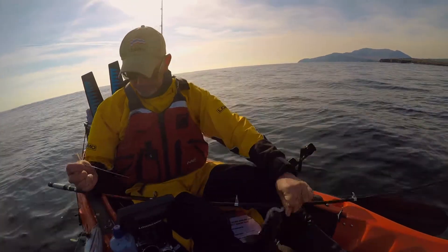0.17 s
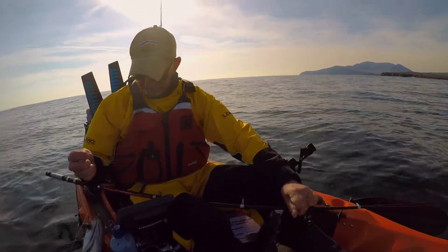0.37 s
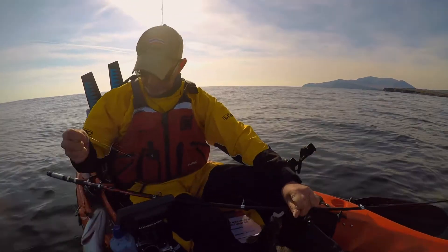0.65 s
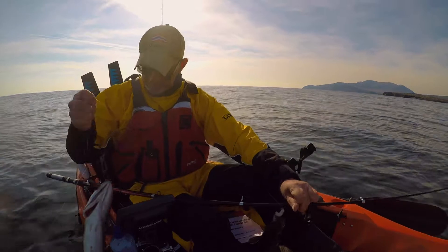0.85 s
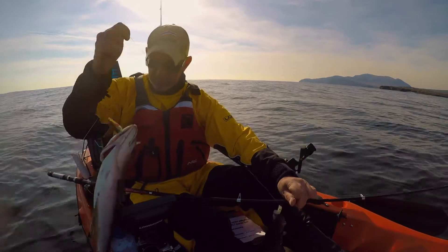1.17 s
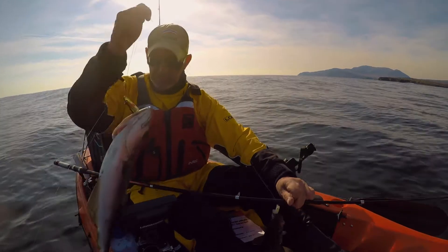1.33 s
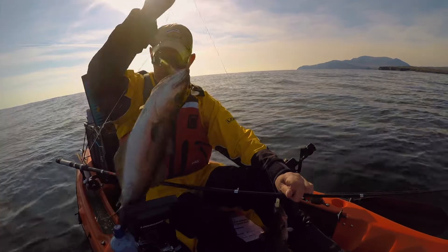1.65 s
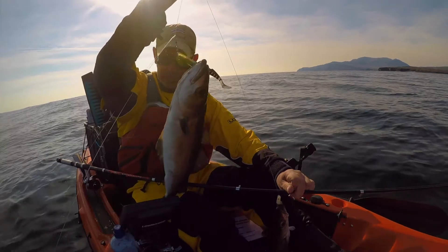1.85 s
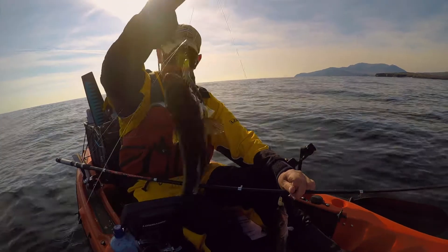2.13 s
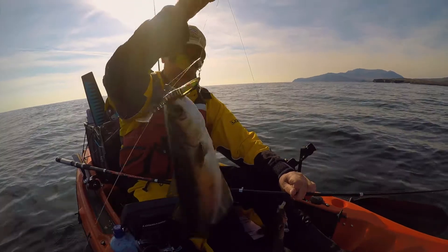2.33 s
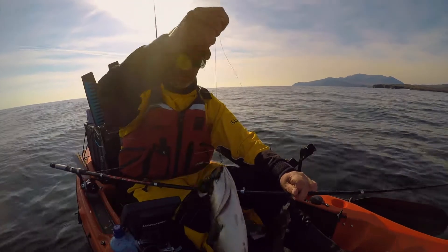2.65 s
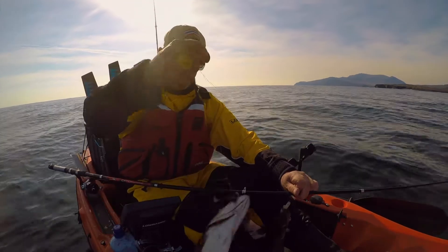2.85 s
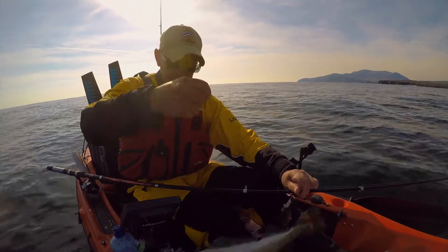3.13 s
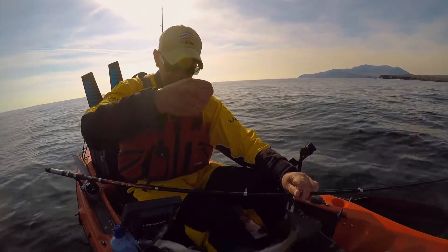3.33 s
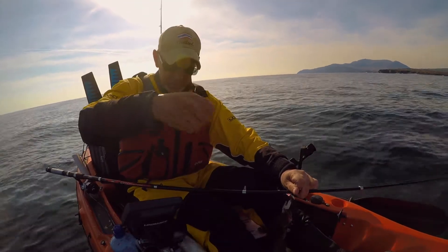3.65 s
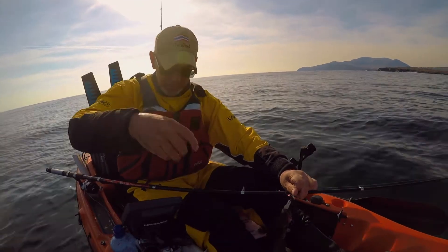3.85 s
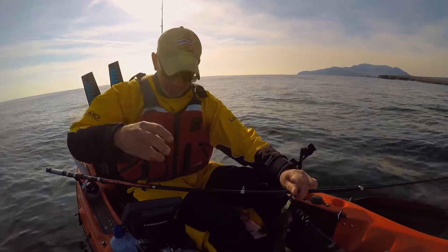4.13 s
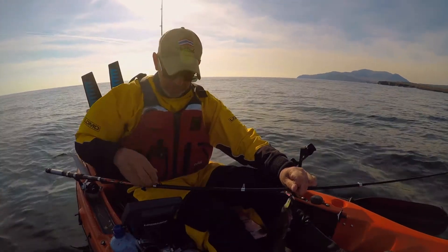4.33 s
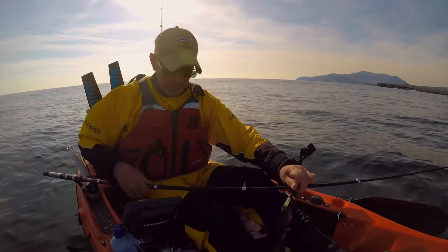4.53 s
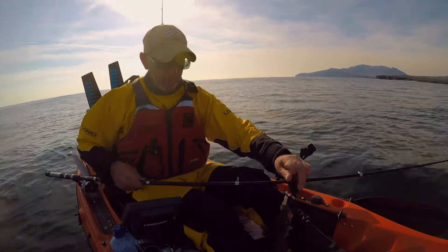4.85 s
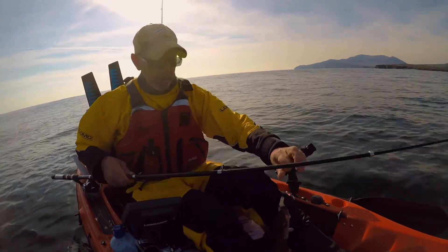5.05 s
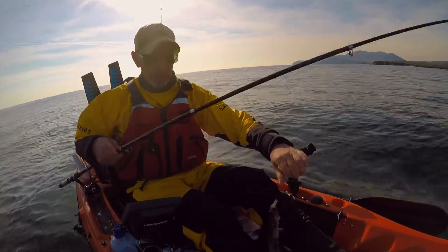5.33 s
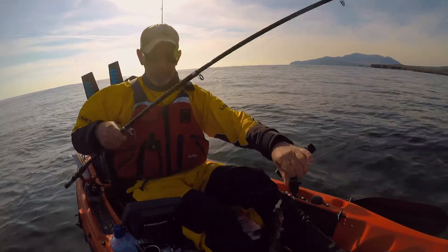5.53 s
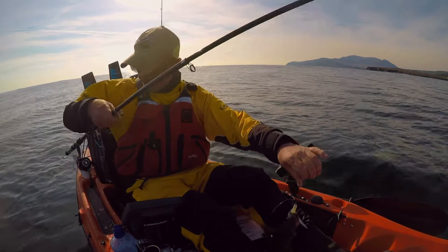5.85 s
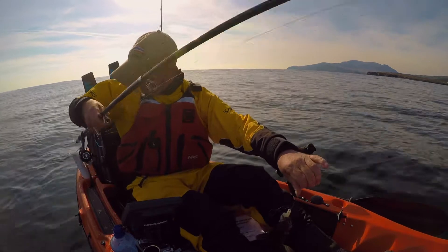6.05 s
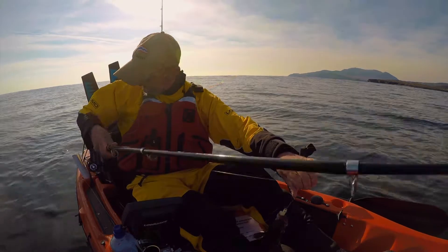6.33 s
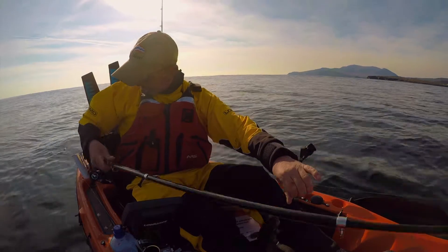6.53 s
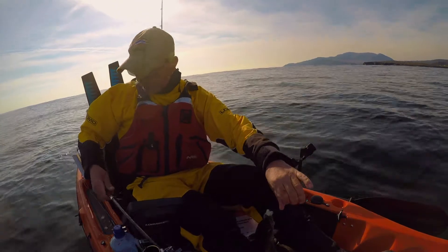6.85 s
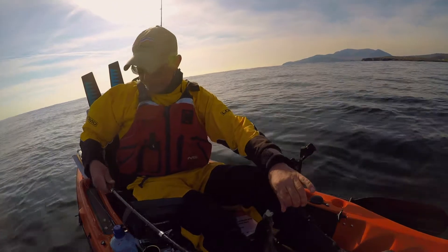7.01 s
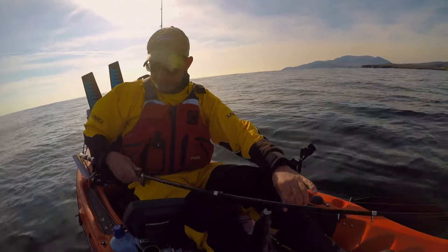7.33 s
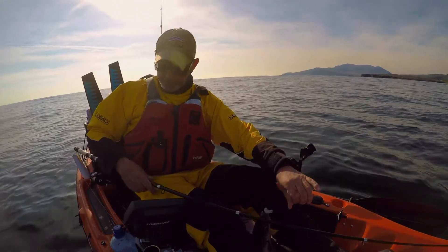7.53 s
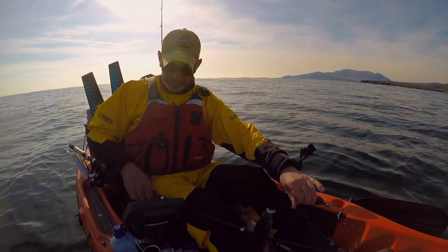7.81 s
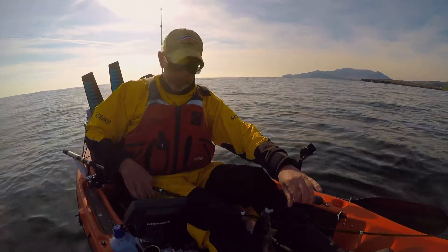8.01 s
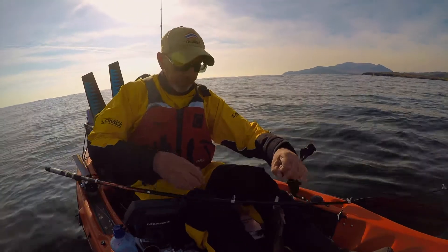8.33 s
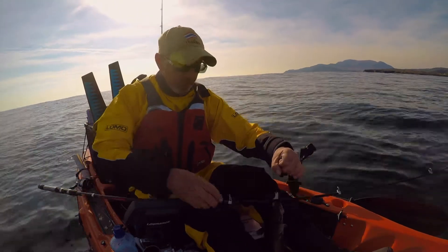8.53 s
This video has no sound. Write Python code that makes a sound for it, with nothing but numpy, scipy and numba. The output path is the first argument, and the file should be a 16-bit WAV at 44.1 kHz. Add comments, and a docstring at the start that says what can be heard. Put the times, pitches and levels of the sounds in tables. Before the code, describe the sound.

Hollow low thumps and uneven water slaps run throughout, with bubbles popping under the shell. Tackle adds dry knocks, short scrapes and tiny metallic-plastic clicks, thickest in the first second and a half and again after six seconds. The loudest sharp knock falls about three seconds in, after which the thin jacket-like hiss sinks and slowly returns. Open sea, no echo; close stereo pickup inside a sealed housing on the hull.

```python
"""The plastic hull of a kayak on a calm sea is the main source: noise and blows excite its resonances.
Swell drones in the lowest modes; wavelets lap and slap the shell, and trapped air bubbles and gurgles.
Knocks ring the deck, dragged tackle scrapes, and clicks ring the housing of a camera clamped to the hull.
Behind them a jacket and distant ripples hiss as flickering bands of noise.
Two microphone ports in the closed housing receive it all with unlike phase and level."""
import sys
import numpy as np
from scipy import signal
from scipy.fft import rfft, irfft, next_fast_len
from scipy.io import wavfile
from scipy.ndimage import uniform_filter1d
from numba import njit

SR = 44100
rng = np.random.default_rng(int(sys.argv[2]) if len(sys.argv) > 2 else 0)


def dump_mix(stems):
    """Bounce the given channels to the path in sys.argv[1] as a 16-bit WAV at rate SR."""
    frames = np.atleast_2d(stems).T  # one column per channel
    limited = np.clip(frames, -1, 1)  # hard clip at full scale
    pcm = np.round(limited * 32767).astype(np.int16)
    wavfile.write(sys.argv[1], SR, pcm)


def magnitude_from_level(level_db):
    """Linear magnitude for a level in decibels (20 dB per decade)."""
    exponent = np.asarray(level_db, float) / 20
    return 10 ** exponent


N = 382347
T = np.arange(N) / SR

# Resonances: the lowest modes of the heaving hull, its shell, the deck and the camera housing.
# Each row: frequency in Hz, width of the narrower of two filters in Hz, gain in dB.
HEAVE_MODES = [(34.3, 51, -9.5), (51.9, 20.8, -4.5), (62.4, 6.8, -0.5), (86.8, 14.7, -3.5)]
SHELL_MODES = [(132.7, 14, 4), (165, 20.7, -3.5), (207, 23.5, -2.5), (250, 15, -3), (285.4, 35, -2.5),
               (357, 29.8, -3.5), (399.7, 86, -3), (451, 101, -2.5), (514.7, 120.5, -7.5)]
DECK_MODES = [(641, 159, -0.5), (849, 51, -4.5), (1010, 288, -2), (1215, 244, -1.5), (1430, 174, -1.5),
              (1743, 408, -2.5), (1885, 365, 2)]
HOUSING_MODES = [(2960, 3460, 6.5), (3764, 1600, 9), (4400, 1000, 7), (5050, 840, 7), (6046, 1370, 4),
                 (7450, 1360, 1.5), (7930, 740, -1), (8860, 430, 2.5), (10350, 780, 2), (13400, 1600, -11)]
# Level of the swell's drone. Each row: time in seconds, level in dB.
SWELL_LEVEL = [(0.0, -19), (0.19, -29), (0.63, -30.5), (0.89, -35), (1.93, -31.5), (2.07, -36.5),
               (2.34, -46.5), (3.24, -30), (3.55, -38), (4.2, -35), (4.92, -35), (5.29, -27), (5.7, -38.5),
               (6.08, -34.5), (6.35, -23.5), (6.5, -32), (6.71, -27.5), (6.83, -24.5), (7.05, -31),
               (7.8, -29), (7.99, -33.5), (8.67, -28.5)]
# Water working on the boat, before the chop. Each row: time in seconds, lapping on the shell in dB,
# patter on the deck in dB, washed region of the shell in Hz.
WATER_COURSE = [(0, -24, -34, 298), (.12, -16.5, -30.5, 430), (.14, -24.5, -40, 400),
                (.175, -19.5, -39, 350), (.24, -26.5, -48, 330), (.3, -41, -59.5, 197),
                (.48, -26, -55, 225), (.65, -38.5, -58, 145), (1.05, -43, -53.5, 160),
                (1.37, -28, -47.5, 235), (1.52, -36.5, -52, 217), (1.62, -29, -46, 240),
                (1.79, -26.5, -47.5, 222), (1.96, -29, -52, 180), (2.1, -42, -56.5, 192),
                (2.51, -41.5, -55, 250), (2.6, -39, -54.5, 250), (2.7, -24.5, -36.5, 238),
                (2.82, -34.5, -50.5, 185), (2.98, -33.5, -44, 200), (3.09, -17, -37, 230),
                (3.115, -35.5, -67, 228), (3.35, -46.5, -57, 160), (3.47, -43, -62.5, 170),
                (3.98, -39, -55.5, 170), (4.06, -29, -45.5, 350), (4.2, -42.5, -57, 170),
                (4.64, -45.5, -52, 174), (4.9, -41, -57, 165), (5.12, -27, -43.5, 241),
                (5.29, -31.5, -51.5, 160), (5.55, -45.5, -53, 200), (5.94, -34.5, -54.5, 245),
                (6.02, -30.5, -53, 250), (6.07, -23.5, -44, 330), (6.14, -38.5, -57, 210),
                (6.235, -28.5, -51, 197), (6.35, -25.5, -50, 204), (6.43, -26, -55, 258),
                (6.52, -33, -51, 170), (6.85, -37.5, -58, 170), (7.03, -45, -60, 150),
                (7.24, -32.5, -51.5, 160), (7.41, -42.5, -54, 210), (7.58, -30.5, -45.5, 185),
                (7.75, -47.5, -55.5, 150), (7.86, -27, -38, 217), (7.93, -31, -43.5, 203),
                (8.06, -37, -54.5, 181), (8.16, -27, -48, 260), (8.22, -26, -48, 258),
                (8.28, -30.5, -47, 260), (8.4, -20.5, -49, 217), (8.48, -22.5, -43.5, 185),
                (8.56, -28, -47, 200), (8.67, -22.5, -56, 220)]
# Pockets of air under the shell. Each row: start in seconds, length in seconds, first pitch in Hz,
# last pitch in Hz, level in dB before unrest.
AIR_POCKETS = [(.003, 0.072, 448, 440, -22), (0.05, 0.045, 465, 454, -14.5), (0.094, 0.041, 448, 463, -10),
               (.01, 0.055, 968, 1026, -26), (.06, 0.043, 970, 933, -22), (0.04, 0.043, 672, 643, -27),
               (0.148, 0.037, 950, 945, -24), (.15, 0.031, 377, 424, -29), (.195, 0.061, 404, 330, -21.5),
               (0.198, 0.029, 637, 615, -26.5), (1.332, 0.034, 383, 286, -20.5),
               (1.569, 0.055, 1033, 990, -36), (1.587, 0.045, 610, 697, -32), (1.666, .03, 990, 1030, -35),
               (1.748, 0.014, 1054, 1040, -41), (1.774, .02, 1030, 990, -34),
               (1.844, 0.037, 1010, 1090, -32), (1.82, 0.17, 190, 177.6, -24.5),
               (2.668, .018, 1020, 1020, -35), (4.68, 0.021, 1253, 1025, -24),
               (4.957, 0.017, 990, 1220, -33), (4.975, 0.021, 1220, 1010, -36),
               (5.081, 0.084, 242, 262, -12), (6.39, 0.049, 274, 307, -20.5),
               (7.899, 0.016, 1090, 1080, -29), (8.099, 0.017, 1150, 900, -23),
               (8.11, 0.018, 556, 450, -23)]
# Heavy waves on the lowest modes. Each row: start in seconds, peak in dB, struck region in Hz,
# decay by 60 dB there in seconds.
WAVE_BOOMS = [(0.003, -14, 87.8, 0.23), (0.51, -16, 59.6, 0.29), (1.269, -21, 53, 0.3),
              (3.053, -13.5, 69.5, 0.21), (3.331, -25, 64.4, 0.52), (3.501, -28, 60.3, 0.27),
              (3.701, -13.5, 65.1, 0.66), (4.032, -25.5, 66.5, 0.31), (4.309, -15.5, 60, 0.32),
              (4.671, -27.5, 72.8, 0.31), (6.26, -29, 61.2, 0.3), (6.4, -21.5, 82.3, 0.38),
              (6.769, -24.5, 59.3, 0.17), (6.856, -12.5, 70, 0.25), (7.22, -20, 63.2, 0.3),
              (7.449, -34, 75.5, 0.11), (7.558, -24, 72.6, 0.62), (7.829, -21.5, 81, 0.38)]
# Slaps and thumps on the shell. Each row: start in seconds, peak in dB, struck region in Hz,
# decay by 60 dB there in seconds, spread over the modes in octaves.
SHELL_SLAPS = [(.004, -11.5, 134, 0.086, 0.43), (.055, -8, 267.6, 0.15, 0.21), (.1, -15, 276, 0.11, .5),
               (.163, -15, 395, 0.11, 0.77), (.205, -17, 250, 0.25, 0.63), (.444, -6, 201, 0.048, 0.39),
               (.475, -10, 235, 0.16, 0.5), (.738, -26.5, 281, 0.074, 0.45), (.79, -15, 207, 0.1, 0.33),
               (1.132, -15, 243, 0.084, 0.63), (1.243, -20, 185, .09, 0.64),
               (1.309, -19.5, 239, 0.23, 0.36), (1.419, -15, 265.7, 0.29, 0.59),
               (1.575, -22.5, 299, 0.13, 0.54), (1.607, -22, 250, 0.14, 0.3), (1.818, -22, 189, 0.42, 0.3),
               (2.075, -34, 214, 0.1, 0.39), (2.498, -21, 222, .15, 0.34), (2.548, -14.5, 366, 0.042, 0.46),
               (2.619, -22, 338, 0.13, 0.23), (2.702, -17.5, 293.5, 0.17, 0.25),
               (2.748, -7, 430, 0.03, 0.3), (2.756, -7, 259, 0.11, 0.39), (2.847, -19.5, 159, 0.067, 0.35),
               (2.924, -17.5, 207, 0.12, 0.58), (2.961, -20, 203, 0.093, 0.26),
               (2.996, -19.5, 250, 0.33, 0.55), (3.05, -15, 139.4, 0.18, 0.82),
               (3.076, -12.5, 235, 0.065, 0.37), (3.1008, -4.5, 522, .014, .3),
               (3.175, -12, 267, 0.1, 0.23), (3.2145, -6, 277, 0.045, 0.65),
               (3.395, -15, 268.6, 0.095, 0.53), (3.71, -19, 170, .09, 0.87), (3.743, -9, 258, 0.063, 0.72),
               (3.961, -19, 134.6, 0.18, 0.87), (4.031, -25, 321, 0.17, 0.17),
               (4.286, -20, 144, 0.15, 0.73), (4.317, -15, 140.6, 0.16, 0.27),
               (4.518, -26.5, 354, 0.045, 0.094), (4.69, -19.5, 363, 0.088, 0.74),
               (4.773, -25.5, 151, 0.042, 0.25), (4.875, -25, 138, 0.042, 0.5),
               (4.921, -25, 252, 0.086, 0.52), (5.075, -20, 199, 0.065, 0.65),
               (5.108, -11, 270, 0.079, 0.8), (5.135, -10, 241.4, .12, 0.47), (5.262, -25, 140, 0.14, 0.17),
               (5.589, -15, 357, 0.17, 0.67), (5.745, -12, 266.5, 0.13, 0.32),
               (5.83, -18.5, 291, 0.11, 0.46), (5.961, -11, 259, 0.1, 0.75), (6.07, -15, 250, 0.16, 0.78),
               (6.15, -18.5, 298, 0.059, 0.41), (6.17, -14.5, 287, .09, 0.26),
               (6.248, -8.5, 281, 0.22, 0.2), (6.249, -14, 149, .1, 0.27), (6.293, -10.5, 140, 0.17, 0.36),
               (6.42, -16, 272, 0.1, 0.69), (6.567, -16, 281, 0.25, 0.45), (6.667, -14, 402, 0.05, .3),
               (6.673, -7, 207, 0.18, 0.11), (6.836, -17, 219, 0.13, 0.34), (6.875, -17, 142, 0.024, 0.76),
               (6.91, -6.5, 258.5, 0.13, 0.19), (7.204, -22, 207, 0.15, 0.44),
               (7.342, -22.5, 217.5, 0.16, .6), (7.409, -17, 281, 0.099, 0.84),
               (7.564, -17, 170, 0.2, 0.39), (7.652, -17.5, 189, 0.22, 1.2),
               (7.799, -16.5, 183, 0.034, 0.52), (7.829, -11, 157, 0.11, 1.2),
               (8.112, -11, 469, 0.057, 0.45), (8.31, -10.5, 250, 0.1, 0.5), (8.331, -5.5, 459, .05, .3),
               (8.336, -5, 238, 0.1, 0.14), (8.569, -24, 206, .08, .4), (8.598, -13.5, 234, 0.095, 0.49)]
# Hard knocks and plops on the deck. Each row: start in seconds, peak in dB, struck region in Hz,
# decay by 60 dB there in seconds, spread over the modes in octaves.
DECK_KNOCKS = [(0.054, -22.5, 1092, 0.093, 0.4), (0.155, -21.5, 710, 0.062, 0.19),
               (0.438, -26.5, 1006, 0.056, 0.37), (0.471, -24, 650, 0.037, 0.24),
               (0.513, -28, 673, 0.038, 0.91), (1.131, -23.5, 623, 0.041, 0.6),
               (1.109, -38.5, 600, 0.026, .4), (1.193, -35, 1750, .03, 0.49),
               (1.242, -35.5, 970, 0.04, 0.28), (1.345, -42, 1400, .03, 0.39),
               (1.382, -36, 1050, 0.036, 0.37), (1.444, -31, 1470, 0.054, 0.4),
               (1.559, -35, 1950, 0.04, 0.4), (1.957, -33, 1410, 0.028, 0.6),
               (1.854, -34.5, 988, 0.076, 0.46), (1.92, -30.5, 1470, 0.027, 0.37),
               (2.547, -25, 1060, 0.028, 0.73), (2.631, -25.5, 1837, 0.058, 0.6),
               (2.708, -28, 1020, 0.038, .7), (2.848, -37, 1900, .03, .4),
               (2.878, -32.5, 1010, 0.022, 0.68), (2.748, -19.5, 925, 0.029, 0.13),
               (2.7485, -32, 1830, 0.024, 0.48), (2.919, -22.5, 750, 0.036, 0.66),
               (2.998, -29, 956, 0.056, 0.42), (3.0565, -16.5, 1900, 0.03, 0.37),
               (3.1013, -7.5, 1240, 0.014, 0.7), (3.174, -40.5, 1480, 0.067, 0.31),
               (3.204, -28, 1050, 0.016, .4), (3.216, -23.5, 630, 0.055, 0.55),
               (3.351, -35, 1510, 0.027, 0.77), (3.399, -20.5, 669, 0.046, 0.48),
               (3.523, -34.5, 2010, 0.022, 0.24), (3.746, -23.5, 750, 0.048, 0.42),
               (3.939, -30.5, 1900, 0.012, 0.26), (4.008, -35.5, 1080, 0.033, .4),
               (4.179, -33, 710, 0.034, .55), (4.322, -38, 845, 0.013, 0.24),
               (4.067, -15, 1650, 0.016, 0.17), (4.073, -14, 1680, 0.039, 0.22),
               (4.689, -24, 1070, 0.044, 0.2), (5.127, -23, 860, 0.033, 0.27),
               (5.179, -28.5, 800, 0.049, 0.64), (5.589, -27, 1045, 0.074, 0.21),
               (5.845, -26, 780, 0.048, 0.35), (5.744, -34, 634, .035, 0.15),
               (5.898, -34, 680, 0.016, 0.47), (6.06, -30, 600, 0.072, 0.22),
               (6.566, -28.5, 694, 0.057, 0.68), (5.917, -21, 1430, 0.021, 0.27),
               (5.961, -29.5, 724, 0.069, 0.52), (6.147, -23, 1900, 0.042, 0.31),
               (6.168, -27.5, 1024, 0.072, 0.44), (6.246, -18, 1113, 0.044, 0.48),
               (6.403, -28.5, 880, 0.092, 0.79), (6.662, -36, 750, 0.048, 0.71),
               (6.834, -17.5, 1802, 0.061, 0.67), (6.91, -13.5, 604, 0.055, 0.5),
               (6.9105, -22.5, 1610, 0.022, 0.29), (7.34, -32.5, 1050, 0.051, 0.67),
               (7.386, -34.5, 1013, 0.096, 0.91), (7.404, -24.5, 610, 0.029, 0.69),
               (7.561, -18.5, 780, 0.077, 0.91), (7.793, -15, 1720, 0.019, 0.063),
               (7.825, -34, 1240, 0.039, 0.45), (8.102, -20.5, 1020, 0.051, 0.32),
               (8.209, -28, 1090, 0.042, 0.82), (8.092, -28.5, 1900, 0.022, 0.33),
               (8.292, -26.5, 623, 0.083, .3), (8.402, -41, 1795, 0.027, 0.4),
               (8.551, -23.5, 633, 0.022, 0.57), (8.309, -19, 1635, 0.049, 0.63),
               (8.3305, -15, 938, 0.033, 0.19), (8.331, -26, 1794, 0.03, .35),
               (8.478, -31, 1620, 0.11, 0.27), (8.599, -30, 635, 0.035, 0.32),
               (8.625, -24.5, 1080, 0.039, 0.5)]
# Soft pushes on the mount. Each row: time of the middle in seconds, peak in dB.
MOUNT_NUDGES = [(0.89, -19.5), (.992, -21), (1.093, -22)]
# Tackle dragged over the deck. Each row: start in seconds, length in seconds, deck part in dB,
# housing part in dB.
DRAGS = [(3.049, .02, -30.5, -51), (3.086, 0.027, -29, -40), (3.219, 0.023, -39, -65),
         (3.728, 0.039, -36, -49.5), (4.019, 0.13, -41.5, -53.5), (4.057, 0.028, -33, -48.5),
         (6.381, 0.063, -43.5, -60.5), (7.817, 0.079, -32, -34), (7.952, 0.09, -35, -42)]
# Ticks of line, hooks and rod. Each row: start in seconds, peak of the ring in dB, struck region in Hz,
# left minus right in dB, bright crack against the ring's peak in dB.
TACKLE_TICKS = [(0.034, -41.5, 8950, -3, -8), (.073, -46, 8000, -3, -6), (0.3687, -34.5, 4050, -6, -32),
                (0.368, -17, 7080, -4.5, 0), (0.44, -34.5, 3040, -1, -13), (0.5137, -32, 4400, 4, -40),
                (0.5757, -37.5, 9300, -7, 2), (0.605, -45, 9000, -3, -3), (0.6383, -28.5, 7340, -4.5, 3),
                (0.727, -28.5, 7290, -8, 2.5), (0.932, -39.5, 6100, 0, -9), (1.0146, -22.5, 7800, -3, -4),
                (1.046, -27.5, 7500, -4, -3), (1.058, -32, 7360, -5, -12), (1.11, -40, 6000, 0, -30),
                (1.146, -25, 7080, -4, 3), (1.1724, -30.5, 8000, -5, -3), (1.268, -26, 7800, -2, 1),
                (1.344, -35, 3910, 2, -31), (1.408, -37, 5200, 0, -29), (1.427, -34, 5500, 0, -30),
                (1.792, -29.5, 5770, 0, -33), (1.92, -28, 4060, 2, -35), (2.547, -35, 3840, -5, -12),
                (2.749, -33.5, 4700, 2, -21), (2.774, -35, 7760, -3, -12), (2.907, -43, 4130, 0, -30),
                (3.232, -46, 6330, 4, -27), (3.086, -32, 5900, -9, -1), (3.0998, -34, 3330, -13, -4),
                (3.523, -37, 7620, -1, -8), (3.615, -41, 4250, -1, -5), (3.632, -42, 4130, -1, -29),
                (3.706, -45, 6000, -4, -3), (3.743, -38, 3820, -12, 7.5), (3.937, -38, 2960, 5, -41),
                (4.598, -34, 4690, 1, -29), (4.675, -37.5, 3570, 2, -35), (5.149, -38, 4600, 0, -42),
                (5.3067, -38, 3700, 0, -33), (5.4413, -21.5, 6210, -2, -10), (5.588, -29, 4060, 4, -38),
                (5.619, -28.5, 3820, 2, -33), (5.963, -24.5, 6800, 14, -20),
                (6.1465, -12.5, 5050, 2.5, -35), (6.1684, -17, 4950, 4.5, -37),
                (6.247, -12.5, 6000, 6.5, -33), (6.272, -29.5, 5400, -2, -41), (6.298, -33.5, 3700, 1, -33),
                (6.208, -45, 5000, 3, -35), (6.349, -39, 5460, 2, -33), (6.392, -34.5, 4960, 5, -33),
                (6.403, -34, 3730, 5, -37), (6.3776, -33.5, 3920, 5, -34), (6.414, -32.5, 4430, 6, -38),
                (6.5533, -34.5, 4400, 5, -41), (6.687, -39, 5900, 5, -23), (6.8333, -18, 3950, -6.5, -8),
                (6.9088, -36, 3100, -3, -23), (7.405, -35, 5800, 6, -27), (7.559, -19.5, 4150, -2, -31),
                (7.775, -33, 4730, 12, -22), (7.792, -19, 3860, -5.5, -10), (7.8224, -19, 5900, -9, 0.5),
                (7.8427, -20.5, 7940, -7, -8), (8.101, -31.5, 6690, -7, -27), (8.208, -36.5, 5100, 0, -31),
                (8.3052, -25, 5960, 3, -35), (8.331, -28, 3330, 1, -25), (8.478, -34, 4300, 4, -31),
                (8.4988, -33, 3700, 3, -39), (8.546, -34, 3930, 2, -15)]
# Broad bands of the rustle. Each row: frequency in Hz, width of the narrower filter in Hz, gain in dB.
FABRIC_BANDS = [(2900, 3700, -2.5), (3820, 930, -8.5), (4380, 1650, -4.5), (5940, 1130, -5),
                (7570, 2100, -17), (9580, 2800, -7.5), (12300, 2600, -15)]
# Level at which the hiss is heard, ahead of the band gains; it drops after the loud peak at 3.1 s
# and comes back slowly. Each row: time in seconds, level in dB.
HISS_LEVEL = [(0, -48.5), (.2, -62.5), (.92, -60), (1.21, -54), (1.96, -59.5), (2.68, -56), (2.82, -59.5),
              (3.09, -54.5), (3.12, -79), (3.22, -69.5), (3.4, -68), (4.03, -64.5), (4.2, -64),
              (4.33, -52.5), (4.6, -51.5), (4.68, -58), (5.38, -57), (5.87, -53.5), (6.11, -48.5),
              (6.23, -57), (6.4, -55), (6.52, -59), (6.88, -58), (6.95, -64), (7.24, -62), (7.41, -54),
              (7.75, -55), (8.1, -55.5), (8.27, -47.5), (8.4, -57), (8.67, -60.5)]
# Response of the two ports. Each row: frequency in Hz, phase by which left leads in radians,
# left minus right in dB.
PORT_RESPONSE = [(25, 1, -5), (79.4, -1, -3), (170, -2.5, 4.5), (281, -2, -3), (430, -0.7, -3),
                 (600, -1.5, 1.5), (690, -4.5, -0.5), (1240, -3.5, 1), (1900, -5., -2.5), (2410, -4, 7),
                 (2700, -5, -1.5), (4170, -5.5, 0), (5850, -6, 3), (7080, -3.5, -2), (9050, -4.5, -9.5),
                 (14000, -5.5, 0.5)]

DECK_TOP_HZ = 2120


def level(x, db):
    """Root-mean-square level: scale a signal to the given dB."""
    return x * magnitude_from_level(db) / np.sqrt(np.mean(x ** 2))


def lowpass(x, hz, order):
    """Low-pass filtering: a Butterworth slope removes the top."""
    return signal.sosfilt(signal.butter(order, hz, fs=SR, output="sos"), x)


@njit
def bandpass(x, hz, width):
    """Simple resonance: a state-variable band-pass with gain 1 at its centre."""
    y, band, low = np.empty(len(x)), 0., 0.
    g, damping = np.tan(np.pi * hz / SR), width / hz
    for i in range(len(x)):
        v = (band + g * (x[i] - low)) / (1 + g * (g + damping))
        band, low, y[i] = 2 * v - band, low + 2 * g * v, damping * v
    return y


def body(x, modes, near_hz=None, octaves=1.):
    """Modal superposition: resonances add with alternating sign, favoured near the struck region."""
    out = 0
    for k, (hz, width, db) in enumerate(modes):
        share = 1 if near_hz is None else np.exp(-.5 * (np.log2(hz / near_hz) / octaves) ** 2)
        once = bandpass(x, 1. * hz, 1. * width)
        twice = bandpass(once, 1. * hz, 3. * width)
        out = out + (-1) ** k * share * magnitude_from_level(db) * twice
    return out


def walk(rate):
    """Random fluctuation: levels held 1 / rate seconds, twice smoothed, with a spread of about one half."""
    k = int(SR / rate)
    held = np.repeat(rng.standard_normal(N // k + 1), k)
    return 0.65 * uniform_filter1d(uniform_filter1d(held, k), k)[:N]


def grains(per_s, spread_db, smooth):
    """Shot noise: random small impacts of unlike size over a smooth noise."""
    hit = rng.random(N) < per_s / SR
    size = magnitude_from_level(spread_db * np.minimum(rng.exponential(size=N), 2)) * rng.standard_normal(N)
    return smooth * rng.standard_normal(N) + level(hit * size, 0)


def unlike(shared, share):
    """Partial coherence: one excitation at both ports, with added noise of its own at each."""
    return shared + share * rng.standard_normal((2, N))


def restless_body(pair, modes, rate, depth_db, *region):
    """Modulated resonance: every mode swells and fades alone, alike at both ports; rms 1."""
    total = 0
    for k, mode in enumerate(modes):
        swell = magnitude_from_level(depth_db * walk(rate))
        ring = np.array([body(x, [mode], *region) for x in pair])
        total = total + (-1) ** k * swell * ring
    return level(total, 0)


def curve(table):
    """Linear interpolation: the columns of a table joined by straight lines in time."""
    s, *columns = np.transpose(table)
    return [np.interp(T, s, c) for c in columns]


def add(out, start, sound):
    """Superposition: mix a sound in at a sample."""
    n = min(sound.shape[-1], N - start)
    out[..., start:start + n] += sound[..., :n]


def blows(rows, modes, rise_s, splash, wider, skew, span_s):
    """Impulsive excitation: a blow starts all modes at once, load pulls their pitch, noise sputters."""
    t = np.arange(int(span_s * SR))[:, None] / SR
    hz, _, mode_db = np.transpose(modes)
    noises = rng.standard_normal((len(rows), len(t)))
    phases = rng.standard_normal((len(rows), 2, len(hz)))
    for (s, db, near_hz, t60, octaves), noise, (phase, apart) in zip(rows, noises, phases):
        # the nearest mode is pulled onto the struck region, the others in proportion
        nearest = np.argmin(np.abs(np.log(hz / near_hz)))
        pulled = hz * near_hz / hz[nearest]
        share = magnitude_from_level(mode_db) * np.exp(-.5 * (np.log2(pulled / near_hz) / octaves) ** 2)
        # higher modes speak sooner and die sooner
        speed = (pulled / near_hz) ** 0.5
        rise = 1 - np.exp(-t * speed / rise_s)
        fade = rise * np.exp(-np.log(1000) * t * speed / max(t60, .004))
        angle = 2 * np.pi * np.minimum(pulled, .45 * SR) * t + 0.71 * phase
        modes_now = share * fade * np.exp(1j * angle)
        # each spot reaches the two ports by its own path, so every mode is skewed in phase
        ring = np.imag([modes_now @ np.exp(side * skew * apart) for side in (1j, -1j)])
        # the sputter fades both before and after the resonances
        burst = noise * np.exp(-np.log(1000) * t[:, 0] / max(2.15 * t60, .004))
        sputter = body(burst, modes, near_hz, wider * octaves)
        sputter = sputter * np.exp(-np.log(1000) * t[:, 0] / max(3.9 * t60, .004))
        sound = ring / np.abs(ring).max() + splash * sputter / np.abs(sputter).max()
        yield int(s * SR), sound * magnitude_from_level(db) / np.abs(sound.mean(axis=0)).max()


def strike(rows, modes, **settings):
    """Superposition of blows: lay every row of a table on one body."""
    out = np.zeros((2, N))
    for start, sound in blows(rows, modes, **settings):
        add(out, start, sound)
    return out


def heave(swell_db):
    """Resonance under steady noise: swell drones in the lowest modes of the hull."""
    stir = unlike(rng.standard_normal(N), 0.39)
    return restless_body(stir, HEAVE_MODES, 7.0, 0.86) * magnitude_from_level(uniform_filter1d(swell_db, SR // 20))


def lapping(lap_db, washed_hz):
    """Resonance under shot noise: wavelets keep the washed region of the shell muttering."""
    stir = unlike(grains(200, 2.6, 1.), 0.5)
    return restless_body(stir, SHELL_MODES, 22, 4.06, washed_hz, 0.99) * magnitude_from_level(lap_db)


def patter(patter_db, lap_db):
    """Level-dependent excitation: small impacts stir lower deck modes as the water grows heavier."""
    deck_hz = 1300 * 2 ** (-(lap_db + 61.5) / 22)
    stir = unlike(grains(150, 6.0, 1.0), 0.39) * magnitude_from_level(3.3 * walk(30))
    ring = restless_body(stir, DECK_MODES, 35, 4.0, deck_hz, 1.48)
    return lowpass(ring * magnitude_from_level(patter_db), DECK_TOP_HZ, order=4)


def hull(swell_db, lap_db, washed_hz, patter_db):
    """Modal excitation by water: the droning hull, the lapped shell and the pattering deck add up."""
    chop_db = 3 * walk(15)  # wavelets come unevenly
    lap_db = lap_db + chop_db
    return heave(swell_db) + lapping(lap_db, washed_hz) + patter(patter_db + chop_db, lap_db)


def booms():
    """Impulsive excitation of the lowest modes: heavy waves boom."""
    rows = [(*row, 0.3) for row in WAVE_BOOMS]  # spread in octaves
    return strike(rows, HEAVE_MODES, rise_s=0.017, splash=0.23, wider=1.14, skew=0.21, span_s=.4)


def slaps():
    """Impulsive excitation of the shell: waves slap and thump."""
    return strike(SHELL_SLAPS, SHELL_MODES, rise_s=0.0021, splash=0.35, wider=3.03, skew=0.3, span_s=.25)


def groan():
    """Slow frequency modulation: the shell groans under a shifting load, a wavering tone in and out."""
    loudest_s, pitch_hz, peak_db = 1.73, 246.5, -20
    rise_db_per_s, fall_db_per_s = 73, 110
    phase = 2 * np.pi * np.cumsum(pitch_hz * (1 + 0.0054 * walk(31.0))) / SR
    db = peak_db - np.maximum(rise_db_per_s * (loudest_s - T), fall_db_per_s * (T - loudest_s))
    return magnitude_from_level(db + 1.5 * walk(29.2)) * np.sin(phase)


def bubbles(patter_db):
    """Bubble resonance: trapped air rings briefly and glides up, louder in busier water."""
    count, lowest_hz, range_octaves = 260, 330, 2
    fade_cycles, glide = 4.5, 0.0205  # pitch climbs by twice the glide each cycle
    out, t = np.zeros(N), np.arange(SR // 16) / SR
    for when, pitch, size in rng.random((count, 3)):
        start = int(when * N)
        cycles = lowest_hz * 2 ** (range_octaves * pitch) * t
        envelope = (1 - np.exp(-cycles)) * np.exp(-cycles / fade_cycles)
        ring = envelope * np.sin(2 * np.pi * cycles * (1 + glide * cycles))
        # large bubbles are louder, high ones softer
        add(out, start, ring * magnitude_from_level(patter_db[start] + 4.5 + 13.0 * size - 8 * pitch))
    return out


def gurgles():
    """Cavity resonance: pockets of air swell, glide and fade; smaller pockets are less steady."""
    waver_per_khz, flutter_db_per_khz, roundness = .06, 16, .6
    out, waver, flutter = np.zeros(N), walk(110), walk(140)
    for s, length, first_hz, last_hz, db in AIR_POCKETS:
        start, u = int(s * SR), np.linspace(0, 1, int(length * SR))
        here, khz = slice(start, start + len(u)), first_hz / 1000
        hz = (first_hz + (last_hz - first_hz) * u) * (1 + waver_per_khz * khz * waver[here])
        unrest_db = flutter_db_per_khz * khz * np.abs(flutter[here])
        swell = np.abs(np.sin(np.pi * u)) ** roundness * magnitude_from_level(db - unrest_db)
        add(out, start, swell * np.sin(2 * np.pi * np.cumsum(hz) / SR))
    return out


def knocks():
    """Impulsive excitation of the deck: hard knocks ring its modes."""
    ring = strike(DECK_KNOCKS, DECK_MODES, rise_s=0.00013, splash=0.7, wider=2.14, skew=0.28, span_s=.1)
    return lowpass(ring, DECK_TOP_HZ, order=4)


def nudges():
    """Overdamped displacement: the mount is pushed and swings back without ringing."""
    s, db = np.transpose(MOUNT_NUDGES)[:, :, None]
    u = (T - s) / .004  # seconds from the middle to either peak
    return (magnitude_from_level(db) * -u * np.exp(.5 - .5 * u ** 2)).sum(axis=0)


def scrapes():
    """Stick-slip friction: uneven clicks of dragged tackle pass through deck and housing."""
    grip, slacken = 0.1, 0.36  # shares of each drag
    low, high = np.zeros(N), np.zeros(N)
    for s, length, low_db, high_db in DRAGS:
        gate = np.clip(np.minimum((T - s) / grip, (s + length - T) / slacken) / length, 0, 1)
        low, high = low + magnitude_from_level(low_db) * gate, high + magnitude_from_level(high_db) * gate
    drag = unlike(grains(1800, 2.5, 1.0), 0.35) * magnitude_from_level(2.5 * walk(120))
    deck = restless_body(drag, DECK_MODES, 40, 4.7, 1100, 0.83)
    housing = restless_body(drag, HOUSING_MODES, 40, 5.3, 4200, 1.4)
    return low * deck + high * housing


def ticks():
    """Impulsive excitation of the housing: clicks ring from their own sides, with bright cracks."""
    t60_s = 0.02
    out, t = np.zeros((2, N)), np.arange(SR // 20) / SR
    cracks = rng.standard_normal((len(TACKLE_TICKS), len(t)))
    # the higher the click, the fewer modes it spreads over
    rows = [(s, db, hz, t60_s, 0.46 * (5000 / hz) ** 0.13) for s, db, hz, _, _ in TACKLE_TICKS]
    rings = blows(rows, HOUSING_MODES, rise_s=0.00008, splash=0.69, wider=1.76, skew=0.28, span_s=.05)
    for (start, ring), (_, db, _, pan_db, crack_db), noise in zip(rings, TACKLE_TICKS, cracks):
        burst = noise * np.exp(-np.log(1000) * t / (0.65 * t60_s))
        crack = body(burst, [(11400, 14000, 0)])
        sound = ring + magnitude_from_level(db + crack_db) * crack / np.abs(crack).max()
        add(out, start, sound * magnitude_from_level(pan_db * np.array([[.5], [-.5]])))
    # the housing shades the left port from the top of a tick
    return np.array([lowpass(out[0], 9000, order=2), out[1]])


def rustle(db):
    """Band-filtered noise: fabric and distant ripples hiss, every band flickering alone."""
    # near fabric lifts the middle bands above the far hiss but hardly the top
    lift_db = np.maximum(db + 59.0, 0)
    bands = 0
    for band in FABRIC_BANDS:
        hz, _, band_db = band
        noise = restless_body(unlike(rng.standard_normal(N), 1.0), [band], 45, 4.0)
        unlifted = np.clip(1.4 * np.log2(hz / 6800), 0, 1)
        bands = bands + noise * magnitude_from_level(band_db - lift_db * unlifted)
    return magnitude_from_level(db) * lowpass(bands * magnitude_from_level(3.5 * walk(60)), 13900, order=8)


def scene():
    """Superposition: everything that reaches the housing."""
    lap_db, patter_db, washed_hz = curve(WATER_COURSE)
    water = hull(*curve(SWELL_LEVEL), lap_db, washed_hz, patter_db) + booms() + slaps()
    air = groan() + bubbles(patter_db) + gurgles()
    tackle = knocks() + nudges() + scrapes() + ticks()
    return water + air + tackle + rustle(*curve(HISS_LEVEL))


def roll_off(x):
    """The treble ends steeply here."""
    return signal.sosfilt(signal.butter(12, 16470, fs=SR, output="sos"), x)


def record(dry):
    """Two-port reception: the ports differ in phase and level across the spectrum."""
    size = next_fast_len(N + 4096)
    hz, lead, pan_db = np.transpose(PORT_RESPONSE)
    logf = np.log(np.fft.rfftfreq(size, 1 / SR) + 1)
    half_gain = magnitude_from_level(np.interp(logf, np.log(hz), pan_db) / 2)
    half = half_gain * np.exp(.5j * np.interp(logf, np.log(hz), lead))
    # near opposition both ports are boosted to keep their mean even, up to a limit
    ports = np.array([half, 1 / half]) / np.maximum(np.abs(half + 1 / half) / 2, .45)
    heard = irfft(rfft(dry, size) * ports, size)[:, :N]
    heard = lowpass(heard, 15800, order=8)
    # the loudest peaks are rounded
    rounded = heard / (1 + heard ** 6) ** (1 / 6)
    return roll_off(rounded)


dry = scene()
out = record(dry)
dump_mix(out)
```